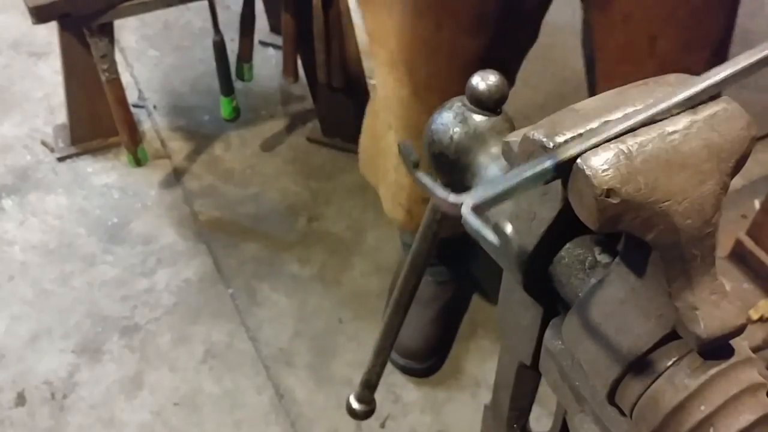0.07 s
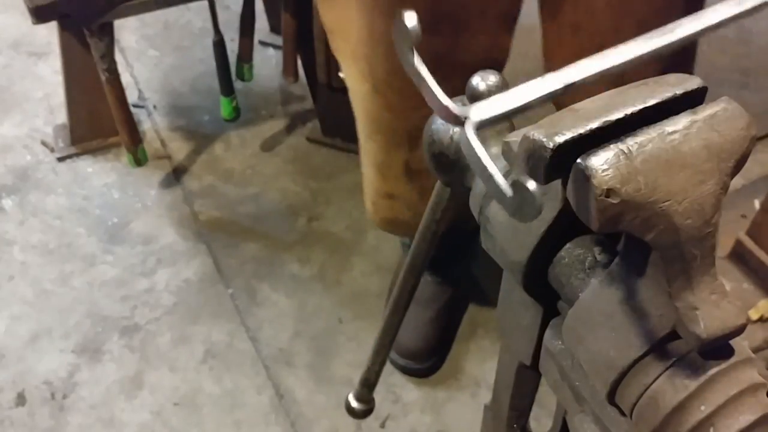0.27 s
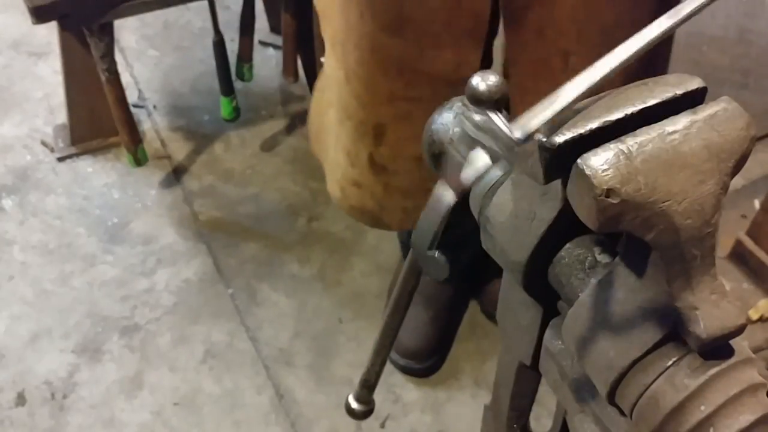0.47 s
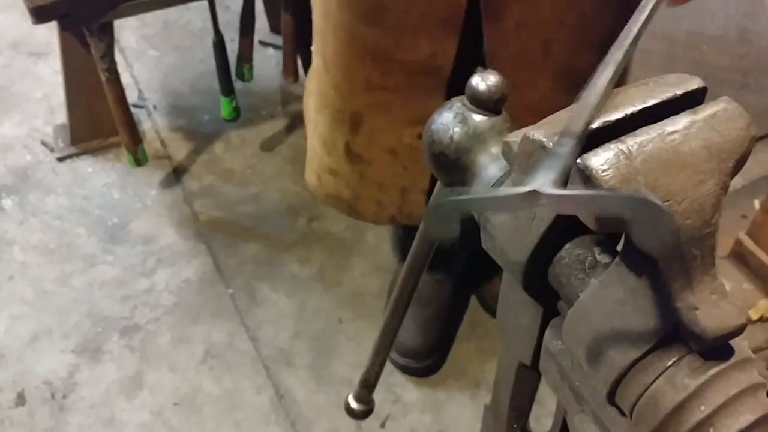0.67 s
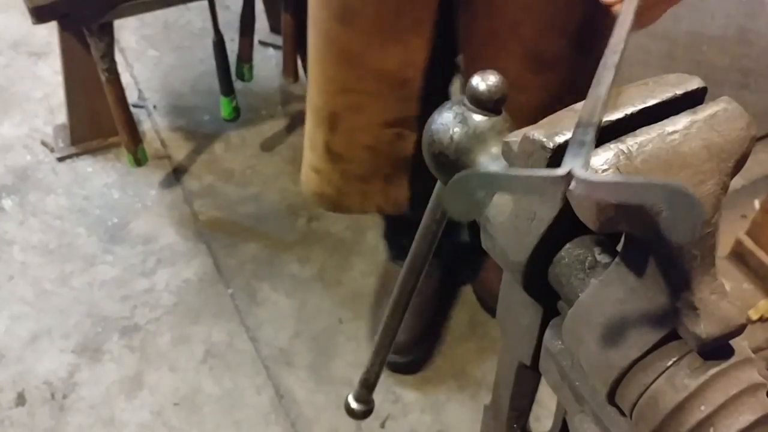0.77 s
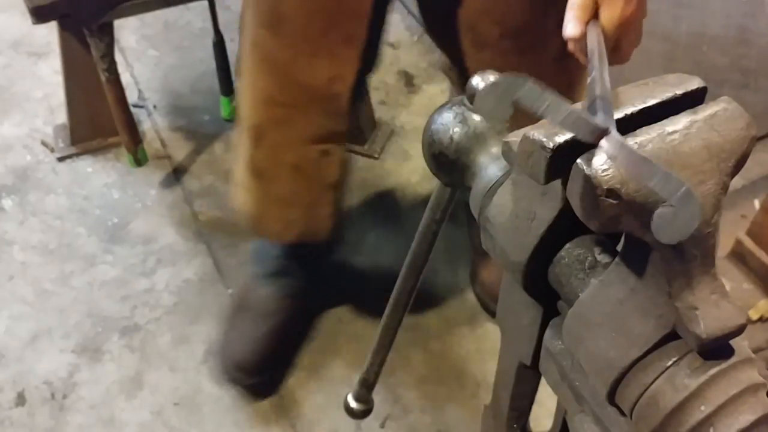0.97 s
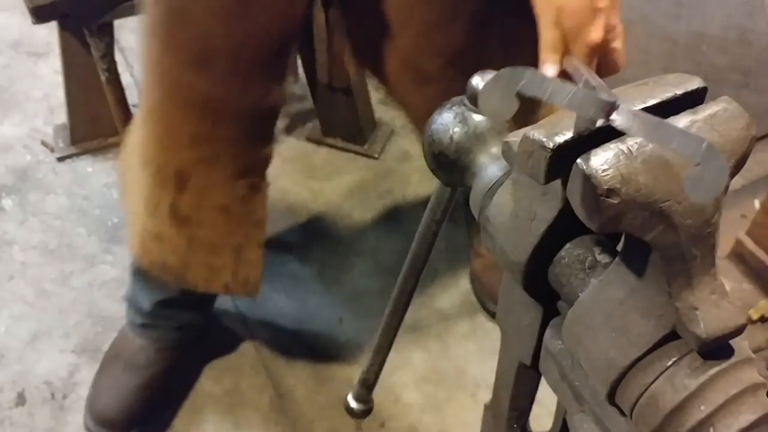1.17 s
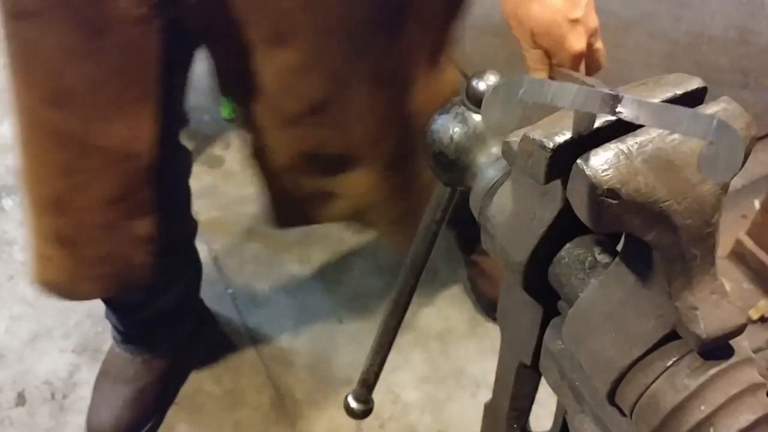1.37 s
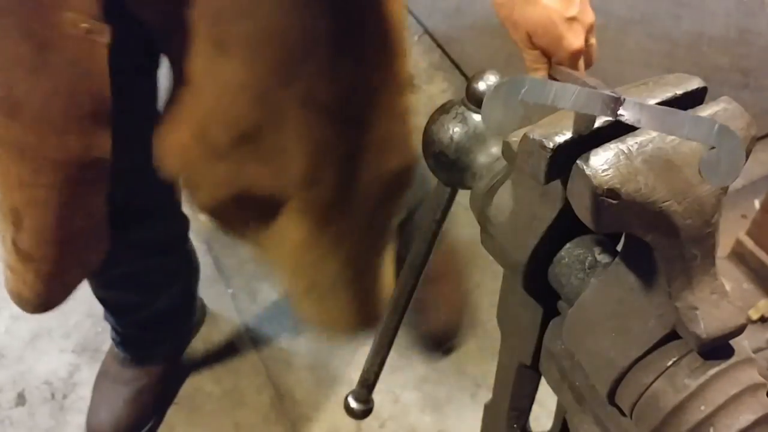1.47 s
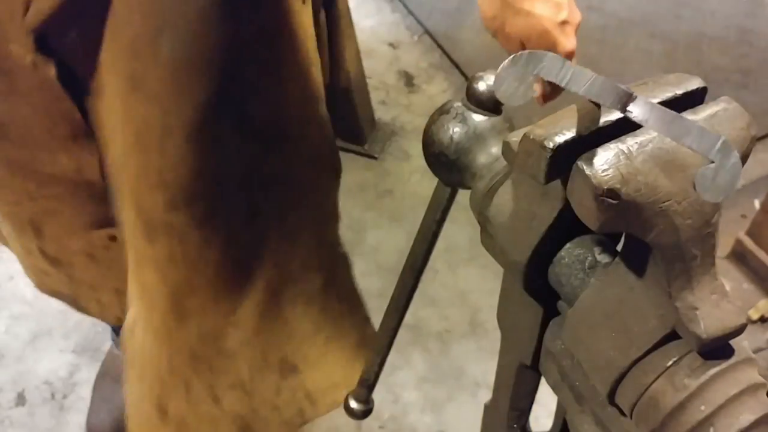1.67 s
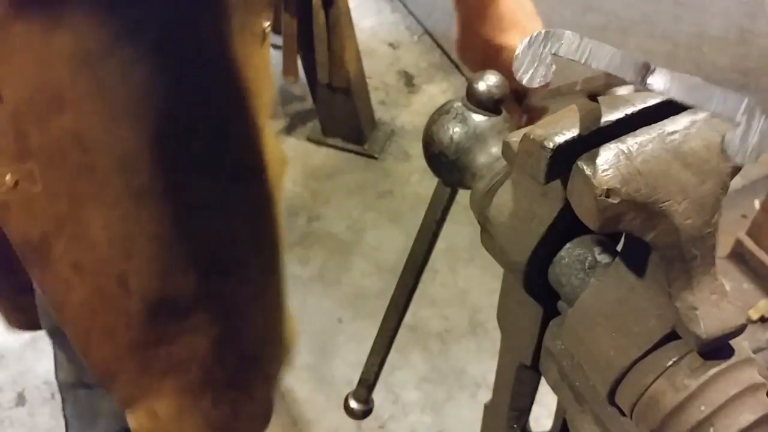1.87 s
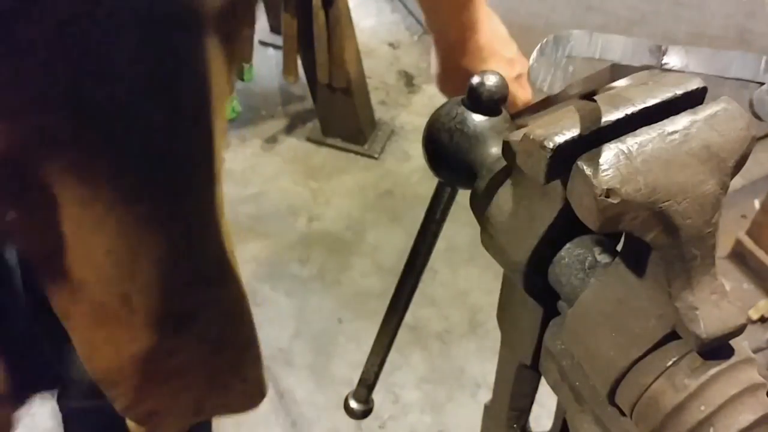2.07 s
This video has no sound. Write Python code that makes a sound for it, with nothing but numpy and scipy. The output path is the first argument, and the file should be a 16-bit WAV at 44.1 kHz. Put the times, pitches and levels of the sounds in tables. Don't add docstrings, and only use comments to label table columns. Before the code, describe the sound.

Steel on a heavy vise, close in stereo. Soft boot thuds and scuffs at 0 and 0.3 s; a sharp clank with small rebounds at 0.58 s, then a dense rattling clatter from 0.74 to 0.87 s with a bass thump and brief wall reflections. Faint sole grating around 1.4 s, heel chatter near 1.84 s, light leather rustles, steady air and low wavering hum.

```python
import sys
import numpy as np
from scipy import signal
from scipy.fft import rfft, irfft, next_fast_len
from scipy.io import wavfile
from scipy.ndimage import map_coordinates

SR = 44100
rng = np.random.default_rng(int(sys.argv[2]) if len(sys.argv) > 2 else 0)


def persist_wave(psi):
    counts = np.round(np.clip(psi, -1, 1) * 32767).astype(np.int16)
    wavfile.write(sys.argv[1], SR, np.atleast_2d(counts).T)


def convert_level_to_amplitude(level_db):
    exponent = np.asarray(level_db, float) / 20
    return 10 ** exponent


N = 93271


def unit(x):
    return x / np.sqrt(np.mean(x ** 2) + 1e-20)


def along(points, hz):
    f, v = np.transpose(points)
    return np.interp(np.log(hz + 1), np.log(f + 1), v)


def wobble(rate, n=N):
    knots = rng.standard_normal(int(n * rate / SR) + 4)
    return map_coordinates(knots, [np.arange(n) * rate / SR])


def rush(gain, alike, n=N):
    m = next_fast_len(n)
    hz = np.fft.rfftfreq(m, 1 / SR)
    turn = np.arccos(np.clip(along(alike, hz), -1, 1)) / 2
    spread = [np.cos(turn), np.sin(turn)]
    spectra = rfft(rng.standard_normal((2, m))) * gain(hz) * spread
    mid, side = irfft(spectra, m)[:, :n]
    return unit(np.array([mid + side, mid - side]))


# (frequency [Hz], density [dB per Hz])
AIR_COLOUR = [(25, -61.5), (60, -13.5), (100, -11.5), (200, -19), (450, -20), (1100, -28.5), (6500, -37),
              (15800, -43)]
# (frequency [Hz], likeness [0-1])
FAR_ALIKE = [(60, 1), (180, 0.8), (550, 0.42), (1650, 0), (15000, 0)]


def shop_air():
    air = rush(lambda hz: convert_level_to_amplitude(along(AIR_COLOUR, hz)), FAR_ALIKE)
    return convert_level_to_amplitude(-63.5 + 1.0 * wobble(3.48)) * air


def shop_hum():
    centre_hz, width_hz = 108, 15.3
    hum = rush(lambda hz: 1 / (1 + ((hz - centre_hz) / width_hz) ** 2), FAR_ALIKE)
    return convert_level_to_amplitude(-65.5 + 2.3 * wobble(3)) * hum


# (frequency [Hz], t60 [s])
WALL_DECAY = [(200, 0.58), (2000, 0.25), (10000, 0.26)]


def walls(x):
    white = rush(lambda hz: 1 + 0 * hz, FAR_ALIKE, SR // 2)
    hz, t, z = signal.stft(white, SR, nperseg=256)
    decay = convert_level_to_amplitude(-60 * t / along(WALL_DECAY, hz)[:, None])
    tail = signal.istft(z * decay, SR, nperseg=256)[1]
    late = np.pad(x, ((0, 0), (200, 0)))
    return signal.fftconvolve(late, tail / np.linalg.norm(tail[0]), axes=1)[:, :N]


# (frequency [Hz], likeness [0-1])
NEAR_ALIKE = [(100, 1), (700, 0.48), (3000, 0.06), (15000, 0.0778)]


def strokes(rows, spectrum):
    out, t = np.zeros((2, N)), np.arange(N) / SR
    for peak, rise, t60, db, tilt_db in rows:
        swell = np.clip(1 + (t - peak) / rise, 0, 1)
        fall = convert_level_to_amplitude(-60 * np.abs(t - peak) / t60)
        shape = np.where(t < peak, swell, fall)
        noise = rush(lambda hz: convert_level_to_amplitude(along(spectrum, hz) + tilt_db * np.log2(hz / 2000 + 0.051)), NEAR_ALIKE)
        grain_db = wobble(60) + wobble(300)
        out += convert_level_to_amplitude(db + grain_db) * shape * noise
    return out


# (peak time [s], rise [s], fall t60 [s], level [dB], tilt [dB per octave])
BOOMS = [
    (.04, 0.038, 0.22, -64, 0),
    (.31, 0.044, 0.37, -59.5, 0),
    (.565, 0.035, 0.13, -57, 0),
    (.79, 0.036, 0.091, -42.5, 0),
    (.86, 0.024, .3, -50.5, 0.0041),
    (1.63, 0.032, 0.44, -59.5, 0),
]
# (frequency [Hz], density [dB per Hz])
BOOM_COLOUR = [(40, -25.5), (70, -6.5), (110, 10), (180, -3.5), (260, -38), (600, -54.5)]


def floor_booms():
    return strokes(BOOMS, BOOM_COLOUR)


# (peak time [s], rise [s], fall t60 [s], level [dB], tilt [dB per octave])
THUDS = [(.005, 0.054, 0.37, -44, 1.5), (.13, 0.012, 0.37, -61.5, 2), (.325, 0.041, 0.23, -46.5, 3.5),
         (.535, 0.016, 0.78, -52, -8.5), (.59, 0.0073, 0.23, -42, 8), (.81, 0.037, 0.48, -45.5, -1.5),
         (1.238, 0.051, 0.25, -57, 3), (1.52, 0.08, 0.37, -63, -5.5), (1.62, 0.031, 0.38, -81, -11.5),
         (1.839, 0.0079, 0.17, -50, -2.5), (1.855, 0.012, 0.16, -52, -0.5), (2.09, 0.13, 0.31, -63.5, 1)]
# (frequency [Hz], density [dB per Hz])
HEEL_COLOUR = [(59, -19), (100, -11), (584, -4), (845, -5), (1160, -12.5), (1300, -14.5), (3000, -28.5),
               (3900, -66), (6600, -120)]


def heel_thuds():
    return strokes(THUDS, HEEL_COLOUR)


# (peak time [s], rise [s], fall t60 [s], level [dB], tilt [dB per octave])
SCUFFS = [(.005, 0.037, 0.19, -58.5, 2.5), (.275, 0.021, 0.44, -56.5, -1), (.325, 0.045, .18, -47, 2),
          (.535, 0.013, 0.1234, -44.5, 3), (.574, 0.049, 0.072, -36.5, -0.5), (1.211, 0.0027, 0.17, -62, 2),
          (1.238, 0.055, 0.22, -55.5, 3), (1.39, 0.15, 0.43, -57.5, -2), (1.56, .01, 0.44, -65.5, 13),
          (1.773, 0.0017, 0.05, -53.5, 6.5), (1.81, 0.04, 0.15, -60.5, -3.5), (1.85, 0.021, 0.43, -50, -2),
          (1.9, 0.042, 0.8, -56, -3.5), (2.1, 0.081, 0.78, -54.5, -1.5)]
# (frequency [Hz], density [dB per Hz])
GRIT_COLOUR = [(350, -13.5), (700, -13.5), (1500, -13), (4000, -12), (6000, -10), (9000, -14), (11000, -13),
               (15800, -20.5)]


def scuffs():
    return strokes(SCUFFS, GRIT_COLOUR)


# (peak time [s], rise [s], fall t60 [s], level [dB], tilt [dB per octave])
GRATES = [
    (1.795, 0.0054, 0.32, -63.5, 17),
    (0.0065, 0.031, 0.57, -52.5, -8),
    (1.382, 0.054, 0.32, -57.5, -5.5),
    (1.82, .025, 0.065, -59.5, 18),
]
# (frequency [Hz], density [dB per Hz])
GRATE_COLOUR = [(1500, -17.5), (2500, 0.5), (4600, 2), (6000, -16), (9000, -57)]


def nail_grating():
    return strokes(GRATES, GRATE_COLOUR)


# (peak time [s], rise [s], fall t60 [s], level [dB], tilt [dB per octave])
RUSTLES = [(.02, 0.09, 0.24, -65, -9), (.278, 0.011, .15, -67, 0.1), (.325, 0.03, 0.1, -54.5, 0.1),
           (1.211, 0.0029, 0.16, -65.5, -0.5), (1.238, 0.0292, 0.16, -54.5, 0.1),
           (1.86, 0.024, 0.28, -62, 3), (.56, 0.027, .1, -52, 1), (.584, 0.0023, 0.15, -41, -4.5),
           (1.41, 0.055, 0.21, -69.5, 0.1)]
# (frequency [Hz], density [dB per Hz])
RUSTLE_COLOUR = [(6500, -44), (8000, -12), (9000, 1.5), (9800, -5), (10500, -40.5)]


def high_rustles():
    return strokes(RUSTLES, RUSTLE_COLOUR)


# (time [s], level [dB])
KNOCKS = [
    (1.2374, -55),
    (1.8354, -48),
    (1.8435, -45),
    (1.849, -43.5),
    (1.8561, -47),
    (1.8681, -52),
    (1.8765, -56),
]
# (frequency [Hz], level [dB], t60 [s])
SLAB = [(378, -6, 0.044), (487, -4.5, .05), (708, 1, 0.028), (845, 2.5, 0.028), (1016, -5.5, .03),
        (1286, -10, .025)]


def heel_cap_knocks():
    out, t = np.zeros((2, N + SR)), np.arange(SR // 10) / SR
    touch = 1 - np.exp(-t / 0.00035)
    for s, db in KNOCKS:
        ring = np.zeros((2, len(t)))
        for hz, level_db, t60 in SLAB:
            level_luck, phase_luck = rng.standard_normal((2, 2, 1))
            tone = np.sin(2 * np.pi * hz * t + 0.56 * phase_luck)
            ring += convert_level_to_amplitude(level_db + 2.56 * level_luck - 60 * t / t60) * tone
        out[:, round(s * SR):][:, :len(t)] += convert_level_to_amplitude(db) * ring * touch
    return out[:, :N]


JAWS_HZ = [110, 180, 480, 560, 1109, 1389, 1567, 2137, 2310, 4219, 7560, 5350, 2686, 7273]
# (level [dB], t60 [s])
JAWS = [(-23, 0.14), (-19.5, 0.12), (-23.5, 0.36), (-18, 0.24), (-12.5, 0.1), (-19, 0.07), (-17.5, 0.21),
        (-14, 0.18), (-1, 0.035), (-6.5, 0.19), (-22.5, 0.1), (-9, 0.085), (-14, 0.14), (-33, 0.091)]
# (frequency [Hz], density [dB per Hz])
CLATTER_COLOUR = [(80, -16.5), (400, -12), (1000, -11.5), (2000, -1.5), (4200, 2), (7000, -7), (9700, -21),
                  (10100, -69)]


def steel(hits, modes_hz, modes, clatter_db, jaws_db):
    clatter_t60, crack_t60, crack_db = 0.18, 0.0073, 2.5
    longest_s, jaws_longest_s, thin_hz = .19, .15, 5000
    twin_spread_hz, twin_db, lag_s = 24, -5, .00007
    ripple_hz, ripple_db = 70, 4
    damped_db, level_luck_db, phase_luck = -3.5, 2.6, .95

    out, t = np.zeros((2, N + SR)), np.arange(SR // 2) / SR
    lag = np.array([[lag_s], [0]])
    all_modes = list(zip(modes_hz, modes))
    for hz, (db, t60) in zip(JAWS_HZ, JAWS):
        all_modes.append((hz, (db + jaws_db, min(t60, jaws_longest_s), 2)))
    ripple = ripple_db * rng.standard_normal(SR // 2 // ripple_hz + 4)
    colour = lambda hz: convert_level_to_amplitude(along(CLATTER_COLOUR, hz) + map_coordinates(ripple, [hz / ripple_hz]))
    clatter_shape = convert_level_to_amplitude(-60 * t / clatter_t60) + convert_level_to_amplitude(crack_db - 60 * t / crack_t60)
    place = rng.standard_normal((len(all_modes), 4, 2, 1))
    for s, db, attack, tilt_db in hits:
        start = round(s * SR)
        clock = t + start / SR - lag
        ring = convert_level_to_amplitude(clatter_db) * rush(colour, NEAR_ALIKE, len(t)) * clatter_shape
        for (hz, (level_db, t60, pan_db)), fixed in zip(all_modes, place):
            luck = rng.standard_normal((3, 2, 1))
            apart = min(hz / 1500, .9)
            shared = luck[1:, :1]
            jolt = phase_luck * (shared + apart * (luck[1:] - shared))
            twin_hz = hz + twin_spread_hz * fixed[2, 0]
            tone = np.sin(2 * np.pi * hz * clock + apart * fixed[1] + jolt[0])
            twin = np.sin(2 * np.pi * twin_hz * clock + apart * fixed[3] + jolt[1])
            side_db = np.array([[pan_db / 2], [-pan_db / 2]])
            tilted_db = level_db + side_db + tilt_db * np.log2(hz / 3000 + 0.28)
            decay_s = min(t60, longest_s, longest_s * thin_hz / hz)
            loudness = convert_level_to_amplitude(tilted_db + level_luck_db * luck[0] - 60 * t / decay_s)
            ring = ring + loudness * (tone + convert_level_to_amplitude(twin_db) * twin)
        touch = 1 - np.exp(-t / attack)
        span = out[:, start:][:, :len(t)]
        span[:] = span * convert_level_to_amplitude(damped_db * touch) + convert_level_to_amplitude(db) * ring * touch
    return out[:, :N]


BAR_HZ = [2223, 2258, 12600, 2560, 2952, 3030, 3456, 3876, 4140, 4284, 5216, 6460, 8215, 9600]
# (level [dB], t60 [s], left over right [dB])
BAR = [(-5.5, 0.15, 0.5), (-5.5, 0.24, 0.5), (-17.5, .07, 2.5), (-14, 0.13, 2.5), (-10, .14, 2),
       (-4.5, .18, 0.5), (-8, 0.16, 3), (-10.5, 0.11, -0.5), (-6, .16, -1.5), (-6.5, 0.13, 2),
       (-15, .15, 3), (-6, .1, 1.5), (-6.5, 0.047, 2), (-5.5, 0.068, 1.5)]
# (time [s], level [dB], attack [s], tilt [dB per octave])
BAR_HITS = [
    (.5815, -25.5, 0.0004, 0.2),
    (.597, -37.5, 0.0015, 0.5),
    (.612, -36, 0.0047, -2.5),
    (.628, -42, 0.0034, 2),
]


def bar_knocks():
    return steel(BAR_HITS, BAR_HZ, BAR, clatter_db=-1, jaws_db=-4)


PIECE_HZ = [1985, 2405, 3043, 3131, 3453, 3901, 4302, 4889, 5304, 6805, 7938, 8927, 11275, 13280]
# (level [dB], t60 [s], left over right [dB])
PIECE = [(-3, 0.12, 0), (-2, 0.11, 4.5), (-5, 0.12, 8), (-4, 0.058, 6.5), (-9, 0.12, 8.5),
         (-15, 0.067, 1.5), (-1, 0.11, 6.5), (-15, 0.16, 4.5), (-7.5, .1, 3), (-14, .14, 2.5),
         (-17.5, 0.11, 2.5), (-8, 0.077, 4.5), (-19, 0.1096, 3), (-29.5, 0.09, 4)]
# (time [s], level [dB], attack [s], tilt [dB per octave])
PIECE_HITS = [(.7435, -25, 0.0032, 0.15), (.7495, -25.5, 0.0011, 0.65), (.7555, -30, 0.0024, -1.6),
              (.767, -27, 0.0032, 0.1), (.779, -31, 0.0016, -2.3), (.7965, -25, 0.00022, -1.9),
              (.808, -29, 0.002, 1.5), (.817, -31, 0.0011, 1.9), (.832, -42, 0.0022, -0.9),
              (.85, -44.5, 0.0043, -1.7), (.872, -46.5, 0.001, -3.2)]


def workpiece_drop():
    return steel(PIECE_HITS, PIECE_HZ, PIECE, clatter_db=-1, jaws_db=0)


def scene():
    shop = shop_air() + shop_hum()
    boots = floor_booms() + heel_thuds() + scuffs()
    boots += nail_grating() + high_rustles() + heel_cap_knocks()
    metal = bar_knocks() + workpiece_drop()
    return shop + boots * convert_level_to_amplitude([[.6], [-.6]]) + metal + convert_level_to_amplitude(-8) * walls(metal)


def roll_off(x):
    return signal.sosfilt(signal.butter(12, 15810, fs=SR, output="sos"), x)


# (frequency [Hz], gain [dB])
PORT = [(30, -20), (55, -0.5), (7200, -2), (8800, 6), (9800, 3), (10200, -8), (15800, 0.5)]


def record(dry):
    m = next_fast_len(N + 4096)
    gain = convert_level_to_amplitude(along(PORT, np.fft.rfftfreq(m, 1 / SR)))
    mix = irfft(rfft(dry, m) * gain, m)[:, :N]
    return roll_off(mix)


dry = scene()
out = record(dry)
persist_wave(out)
```